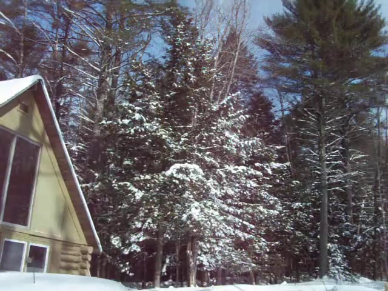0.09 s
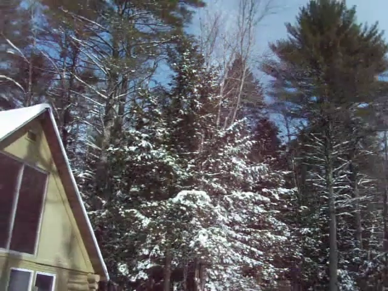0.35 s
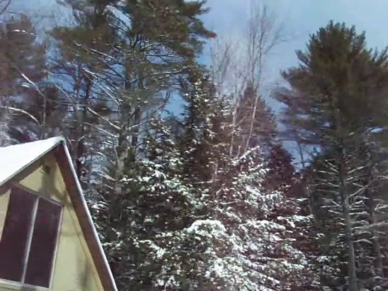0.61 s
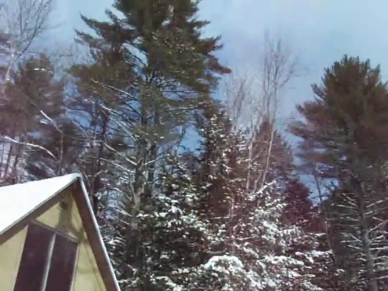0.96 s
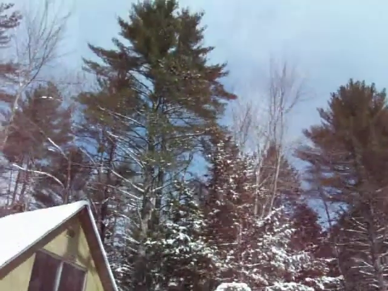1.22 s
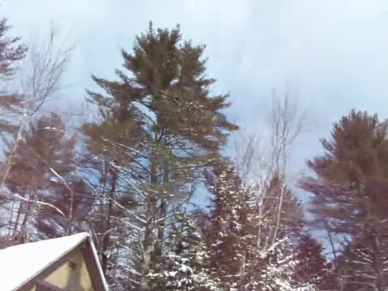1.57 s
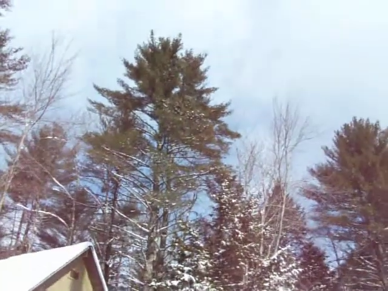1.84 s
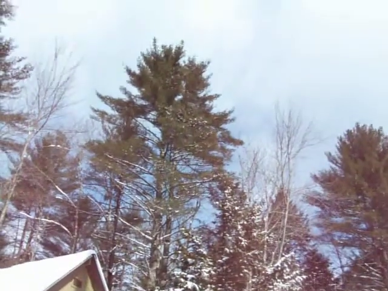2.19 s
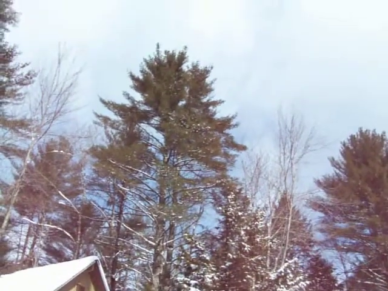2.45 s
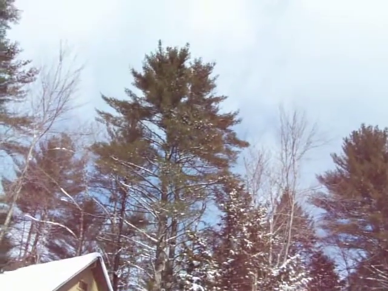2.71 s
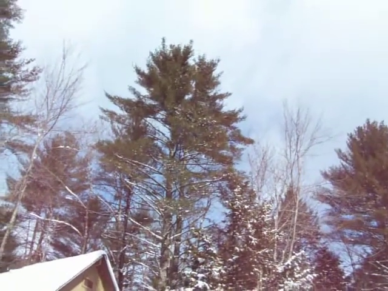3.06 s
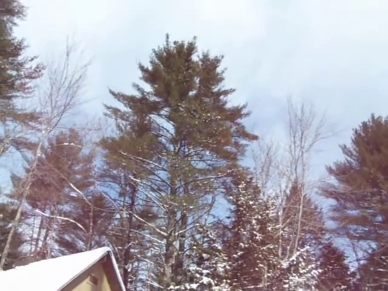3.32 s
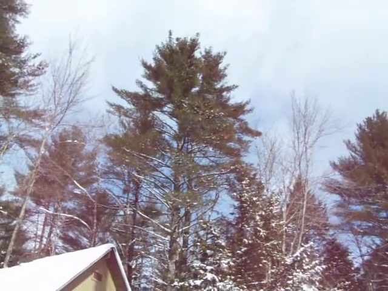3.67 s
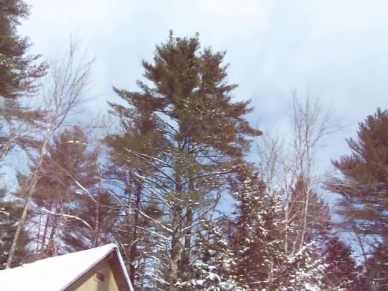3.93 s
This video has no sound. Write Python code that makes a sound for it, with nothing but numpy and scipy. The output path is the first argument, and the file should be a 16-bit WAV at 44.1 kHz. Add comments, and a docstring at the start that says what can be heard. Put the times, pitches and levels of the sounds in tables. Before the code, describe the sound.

Steady wind hissing in pine trees, with soft microphone thumps and one sharp tick.

```python
"""After a short silence, the sound of wind in tall pines round a snowy yard fades in.
Puffs of air tumble over the microphone as a low rumble with soft thumps, and the hand-held camera's
plastic case gives one sharp tick among a few faint ones. A deeper roar from the trees then swells and
eases. The needles rush steadily to the end, with more puffs and thumps, over a faint low hum."""
import sys
import numpy as np
from scipy import signal
from scipy.fft import rfft, irfft
from scipy.io import wavfile

SR = 44100
rng = np.random.default_rng(int(sys.argv[2]) if len(sys.argv) > 2 else 0)


def file_out(sig):
    """Save sig as 16-bit WAV at sys.argv[1]."""
    # one column per channel
    cols = np.atleast_2d(sig).T
    # limit, then scale
    lim = np.clip(cols, -1, 1)
    pcm = np.round(lim * 32767).astype(np.int16)
    wavfile.write(sys.argv[1], SR, pcm)


N = 176400
T = np.arange(N) / SR
BIN_HZ = np.arange(N // 2 + 1) * SR / N   # the pitch of each slot in a spectrum
FLUTTER_PER_S = 11


def pine_rush():
    """Countless needles hiss together in the wind; each band of pitch sways and flutters a little."""
    # The tone of the hissing needles: pitch_hz, level_db
    needle_spectrum = [(30, -1.5), (80, -8.5), (125, -8.5), (250, -2.5), (330, -4), (450, -3), (750, -4),
                       (950, -1), (1250, -4.5), (1600, -2.5), (2400, -4.5), (3300, -4), (3880, -0.3),
                       (4350, -4.5), (4950, -13.5), (6200, -20.5), (7500, -25.5), (8100, -31.5),
                       (8600, -45), (9100, -74)]
    # How the wind in the treetops rises and falls: time_s, change_db
    wind_strength = [(.4, 0.7), (.9, -0.8), (1.3, -1.55), (1.8, -.1), (2.3, -0.5), (2.75, 1.26),
                     (3.3, -0.1), (4, 0)]
    rush_db, sway_db, flutter_db, sway_per_s = -37.5, 0.32, 0.66, 1.4
    bands = split_bands(coloured_noise(needle_spectrum), count=9)
    shared_sway = drift(sway_per_s)
    rush = np.zeros(N)
    for band in bands:
        sway = shared_sway + drift(sway_per_s)
        rush += band * from_db(sway_db * sway + flutter_db * drift(FLUTTER_PER_S))
    return from_db(rush_db + in_time(wind_strength)) * rush


def air_puffs():
    """Each puff swells and fades as a low rumble on the microphone; faster air reaches higher pitches."""
    # Puffs of air on the microphone: middle_s, length_s, level_db, top_pitch_hz
    puffs = [(0.454, 0.095, -28, 148), (0.566, 0.048, -26, 152), (0.675, 0.065, -32, 114),
             (0.844, 0.12, -42.5, 89), (0.937, 0.055, -35.5, 110), (1.016, .06, -36, 111),
             (1.124, 0.032, -35, 178), (1.236, 0.036, -34, 190), (1.307, 0.067, -43, 70),
             (1.4, 0.019, -42, 68), (1.978, 0.053, -45, 80), (2.438, 0.054, -35.5, 73.6),
             (2.573, 0.029, -47, 60), (3.053, 0.081, -38, 98), (3.125, 0.063, -39, 120),
             (3.22, 0.14, -45.5, 79.7), (3.342, 0.027, -42, 90), (3.448, 0.066, -39.5, 109),
             (3.568, 0.085, -40.5, 100), (3.65, 0.046, -44, 85), (3.72, 0.05, -38.5, 80)]
    lowest_hz, steepness = 15, 4.07
    turbulence = rfft(rng.standard_normal(N)) * BIN_HZ / np.hypot(BIN_HZ, lowest_hz)
    out = np.zeros(N)
    for middle_s, length_s, level_db, top_hz in puffs:
        swell = np.exp(-2 * ((T - middle_s) / length_s) ** 2)
        rumble = irfft(turbulence / np.hypot(1, (BIN_HZ / top_hz) ** steepness), N)   # cut the highs
        puff = swell * rumble
        even_out = np.sqrt(np.sum(swell ** 2) / np.sum(puff ** 2))   # brings the rumble to strength 1
        out += from_db(level_db) * puff * even_out
    return out


def air_thumps():
    """A small swirl of air passes the microphone as one quick push and pull of pressure."""
    # Swirls that thump the microphone: middle_s, peak_db, pitch_hz
    swirls = [(0.559, -19, 187), (0.611, -20, 69.6), (.982, -18, 154), (0.9862, -18, 67), (.997, -24, 130),
              (1.028, -25.5, 110), (1.109, -27.5, 170), (1.226, -27, 150), (1.251, -24.5, 148),
              (2.454, -30.5, 90), (2.725, -29.5, 190), (3.132, -25.5, 92), (3.546, -26.5, 60),
              (3.647, -21.5, 80)]
    half_width_cycles = 0.27
    out = np.zeros(N)
    for middle_s, peak_db, pitch_hz in swirls:
        position = (T - middle_s) * pitch_hz / half_width_cycles   # push at -1, pull at +1
        out -= from_db(peak_db) * position * np.exp(0.5 - position ** 2)
    return out


def case_ticks():
    """The plastic case gives a bright two-tone snap, then rings for a moment."""
    # Ticks of the case: start_s, snap_db, snap_pitch_hz, ring_db
    ticks = [(.554, -31.5, 5430, -50), (.572, -48, 4500, -25.5), (0.752, -13, 4550, -17),
             (0.8064, -40, 3300, -27.5), (.9694, -38, 3300, -31.5), (1.2866, -33, 5750, -25)]
    # The tones the case rings with: pitch_hz, level_db, fade_s
    case_tones = [(2400, 1, 0.018), (2620, -4.5, 0.015)]
    spread, ring_delay_s = 0.18, 0.00086
    out = np.zeros(N)
    for start_s, snap_db, snap_hz, ring_db in ticks:
        for pitch_hz in (snap_hz * (1 - spread), snap_hz * (1 + spread)):
            out += from_db(snap_db) * ring(start_s, pitch_hz, fade_s=0.0036, rise_s=0.00062)
        for pitch_hz, level_db, fade_s in case_tones:
            tone = ring(start_s + ring_delay_s, pitch_hz, fade_s, rise_s=0.00078)
            out += from_db(ring_db + level_db) * tone
    return out


def treetop_roar():
    """Wind in the treetops makes a broad, hollow roar that swells and eases off."""
    # The tone of the roar: pitch_hz, level_db
    roar_spectrum = [(200, -25), (340, -4), (440, 3.5), (600, 7), (760, -7.5), (1100, -37)]
    # How loud the roar is: time_s, level_db
    roar_level = [(.4, -65), (.9, -56), (1.5, -49), (2.0, -50.5), (2.7, -56.5), (4, -53)]
    flutter_db = 1.5 * drift(FLUTTER_PER_S)
    return from_db(in_time(roar_level) + flutter_db) * coloured_noise(roar_spectrum)


def low_hum():
    """A faint low tone whose loudness wavers."""
    pitch_hz, level_db, waver_db = 73.2, -57.5, 1
    tone = np.sqrt(2) * np.sin(2 * np.pi * pitch_hz * T)
    return from_db(level_db + waver_db * drift(3)) * tone


def from_db(db):
    """Turn decibels into a number to multiply by."""
    return 10 ** (np.asarray(db) / 20)


def rms_one(x):
    """Scale a signal so its average strength (rms) is 1."""
    return x / np.sqrt(np.mean(x ** 2) + 1e-20)


def in_time(rows):
    """Join (time_s, value) points by straight lines."""
    return np.interp(T, *np.transpose(rows))


def drift(per_s):
    """A smooth random wander, about 1 in size."""
    step, warm_up = 40, 2000   # one value every 40 samples; the first 2000 are dropped
    memory = np.exp(-2 * np.pi * step * per_s / SR)
    noise = rng.standard_normal(N // step + warm_up + 2)
    slow = signal.lfilter([1], [1, -2 * memory, memory ** 2], noise)[warm_up:]
    return np.interp(np.arange(N) / step, np.arange(len(slow)), rms_one(slow))


def coloured_noise(spectrum):
    """Noise of strength 1, its tone shaped by (pitch_hz, level_db) points."""
    hz, db = np.transpose(spectrum)
    shape_db = np.interp(np.log(np.maximum(BIN_HZ, 1)), np.log(hz), db)
    return rms_one(irfft(rfft(rng.standard_normal(N)) * from_db(shape_db), N))


def split_bands(x, count):
    """Split a sound into overlapping bands of pitch that add up to the whole."""
    centres = np.log(np.geomspace(200, 7000, count))
    log_hz, whole = np.log(np.maximum(BIN_HZ, 1)), rfft(x)
    return [irfft(whole * np.interp(log_hz, centres, share), N) for share in np.eye(count)]


def ring(start_s, pitch_hz, fade_s, rise_s):
    """A tone that swells quickly, then dies away by 60 dB every fade_s."""
    age = np.clip(T - start_s, 0, 3 * fade_s)
    rise = 1 - np.exp(-(age / rise_s) ** 2)
    fade = from_db(-60 * (age - rise_s) / fade_s)
    return np.sin(2 * np.pi * pitch_hz * age) * fade * rise


def scene():
    """Everything reaches one microphone, alike in both ears."""
    mono = pine_rush() + treetop_roar() + air_puffs() + air_thumps() + case_ticks() + low_hum()
    return np.array([mono, mono])


def record(dry):
    """The sound fades in and the highest treble is cut away."""
    # The microphone's fade-in: time_s, gain_db
    fade_in = [(.367, -70), (.374, -26), (.5, -18.5), (.62, -11), (.72, -5.5), (.79, 1)]
    cutoff_hz = 8850
    low_pass = signal.ellip(12, 0.1, 80, cutoff_hz, fs=SR, output="sos")
    return signal.sosfilt(low_pass, dry * from_db(in_time(fade_in)))


dry = scene()
out = record(dry)
file_out(out)
```